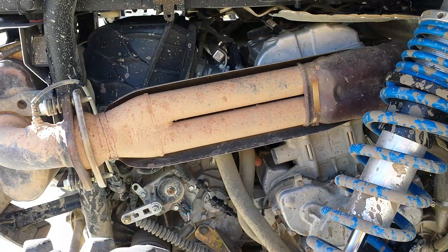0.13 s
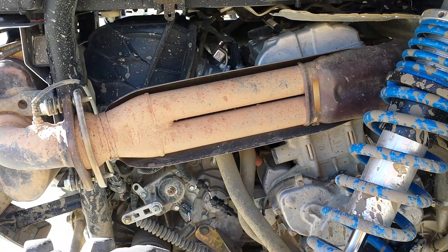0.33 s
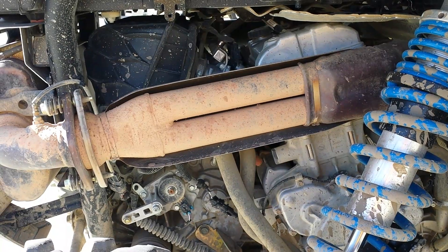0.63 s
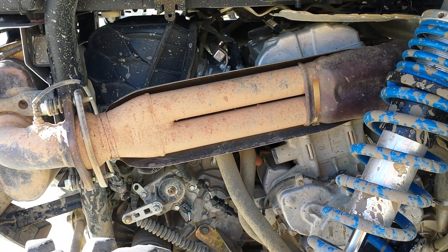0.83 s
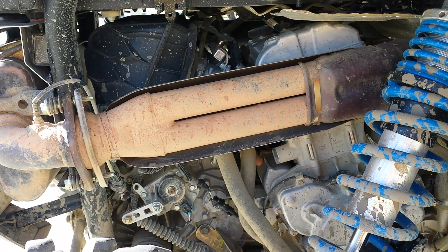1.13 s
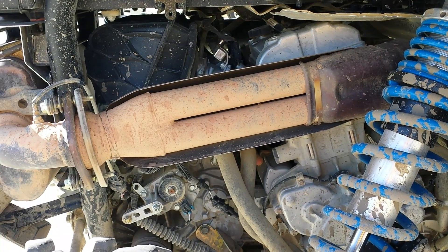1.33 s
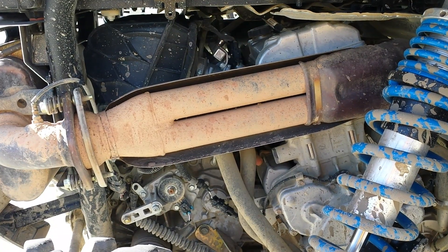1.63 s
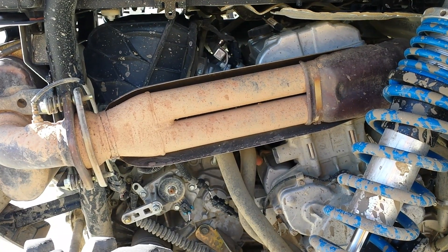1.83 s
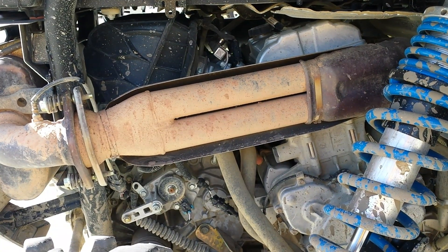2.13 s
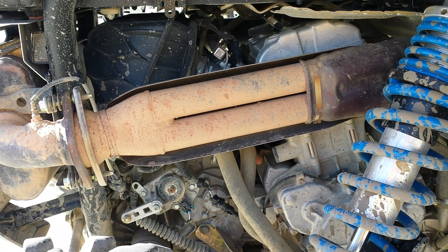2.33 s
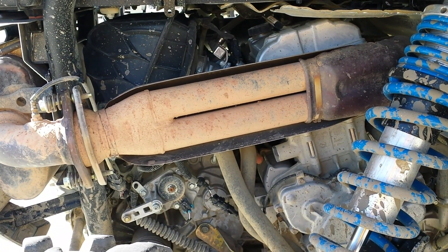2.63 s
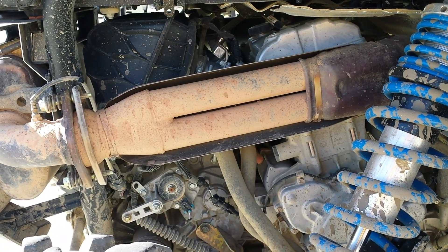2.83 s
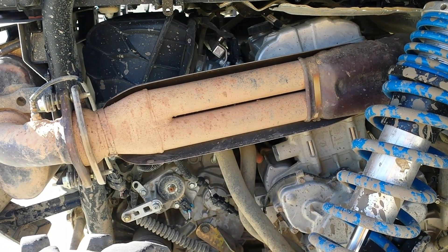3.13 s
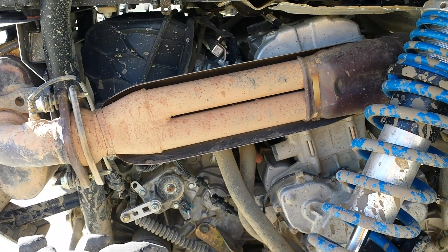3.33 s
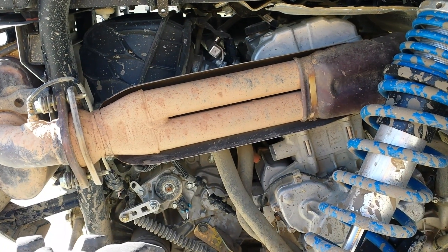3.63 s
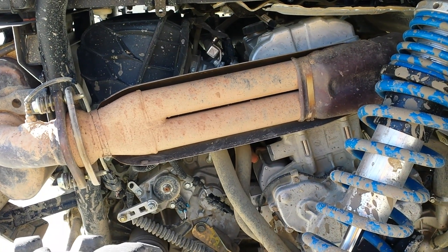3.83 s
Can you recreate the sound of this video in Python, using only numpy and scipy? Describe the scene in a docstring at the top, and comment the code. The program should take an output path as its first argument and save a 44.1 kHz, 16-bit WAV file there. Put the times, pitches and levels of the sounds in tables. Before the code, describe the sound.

An off-road vehicle engine idles with a deep boom and fast, regular metallic knocking.

```python
"""Beside an idling off-road vehicle, a stereo pair of microphones close to the engine.
After a moment of silence the sound fades in. In each working cycle, about eleven a second, two gas
pulses ring the ducts with a deep boom; then a cluster of metal contacts knocks on the block and its
covers. The valve gear ticks to the right, and a steady mechanical hiss lies behind it all."""
import sys
import numpy as np
from scipy.fft import rfft, irfft, next_fast_len
from scipy.io import wavfile
from scipy.ndimage import uniform_filter1d, minimum_filter1d

SR = 44100
rng = np.random.default_rng(int(sys.argv[2]) if len(sys.argv) > 2 else 0)


def dump(signal):
    """Clip the signal to [-1, 1] and save it as 16-bit WAV at the path in sys.argv[1]."""
    limited = np.clip(np.atleast_2d(signal).T, -1, 1)
    pcm = np.round(limited * 32767).astype(np.int16)
    wavfile.write(sys.argv[1], SR, pcm)


N = 176400

# Levels within a table are relative; balance is left minus right.
# start of each working cycle (time [s])
CYCLE_STARTS = [.321, .4123, .5049, .5975, .6869, .7741, .8639, .9569, 1.0458, 1.1343, 1.2202, 1.3061,
                1.3969, 1.4838, 1.5686, 1.6534, 1.7441, 1.8331, 1.923, 2.0101, 2.0972, 2.1842, 2.2726,
                2.3596, 2.4495, 2.5393, 2.6289, 2.7201, 2.8097, 2.8993, 2.99, 3.0788, 3.165, 3.2516, 3.3386,
                3.4284, 3.517, 3.6033, 3.6891, 3.7771, 3.8644, 3.9555, 4.045]
# gas pulses (time into the cycle [s], level [dB])
GAS_PULSES = [(-.0015, -6), (0.019, -7)]
# duct resonances (frequency [Hz], level [dB], t60 [s])
DUCT_MODES = [(52, -70, 0.064), (97.4, 2.5, 0.17), (177.6, -8.5, 0.098), (277.4, -15, 0.083)]
# metal contacts (time into the knock [s], cover [dB], block [dB], clatter [dB], tick [dB])
METAL_CONTACTS = [(.0004, -7, 1.5, -3.5, -1), (.0072, -8, 0, -3.5, 0.5), (0.0138, -3, -25, 0, -7),
                  (.021, -7.5, -7, -6, -8.5), (0.031, -6.5, -25, -14.5, -8), (0.0366, -4, -9, -9, -6),
                  (.047, -12.5, -11, -16, -13), (.061, -7, -16.5, -7, -6.5)]
# block resonances (frequency [Hz], level [dB], t60 [s], balance [dB])
BLOCK_MODES = [(1068, -1, 0.093, 1), (1210, -15.5, 0.091, -2), (1277, -5.5, 0.11, -14), (1338, -7, 0.12, 3),
               (1415, 2.5, 0.12, -1.5), (1467, -5.5, 0.26, 5), (1494, -5, 0.067, -1),
               (1584, -2.5, 0.11, 13), (1779.4, 2.5, 0.072, 7), (1812, -9, 0.14, -25),
               (2002, -2, 0.16, -41), (2122, -4.5, 0.1, -27), (2146, -4, 0.11, -5), (2200, -6, 0.11, 2),
               (2390, -15.5, 0.19, -1), (2457, -4, 0.11, 0), (2580, -5.5, 0.14, 1), (2675, -8.5, 0.1, 4),
               (2780, -3.5, 0.1, -1), (2838, -3.5, 0.077, -4), (2960, -14, 0.071, -2)]
# dense ringing of the small parts (frequency [Hz], level [dB])
CLATTER_SPECTRUM = [(500, -19), (950, -12), (1400, 3.5), (2100, -1.5), (2850, -4.5), (3300, -17),
                    (4500, -16), (9000, -55)]
# cover resonances (frequency [Hz], width [Hz], level [dB], balance [dB])
COVER_MODES = [(284, 55, -6, -31.5), (368, 15, -5.5, 14), (463, 73, -10.5, -4.5), (769, 35, 1, -5),
               (836, 11.4, 5.5, 0), (850, 10.7, 1, 15.5)]
# treble of the contacts (frequency [Hz], level [dB])
TICK_SPECTRUM = [(1500, -30), (3000, -3), (4100, -5), (4900, 3.5), (5450, 4), (6000, 1), (6800, 2),
                 (7600, 2), (8600, -7.5), (9700, -15.5), (11000, -13.5), (12200, -0.5), (13200, -18),
                 (14400, -11)]
# valve gear resonances (frequency [Hz], width [Hz], level [dB], balance [dB])
VALVE_MODES = [(5140, 38, -4, -15), (5453, 22, 6.5, -5), (5830, 31, 3, -13), (6460, 59, 2.5, -13),
               (6840, 90, -4.5, -31), (8470, 140, -6, -4), (12250, 85, -23, -39)]
# steady running noise (frequency [Hz], level [dB])
HISS_SPECTRUM = [(25, -26), (60, 11), (150, 10.5), (300, 0.5), (600, -2.5), (850, 1), (1500, 5.5),
                 (2700, 0), (4000, -8.5), (6200, -4.5), (8500, -9), (9800, -20), (12500, -16.5),
                 (14300, -16.5)]
# where the noise sits between the microphones (frequency [Hz], balance [dB])
MIC_BALANCE = [(1000, 5), (2000, -4), (4000, -3.5), (6500, -5), (8500, -11.5), (10300, -8), (12000, -37),
               (14000, -43)]
# how alike the two microphones hear it (frequency [Hz], correlation [0..1])
MIC_CORRELATION = [(100, 0.86), (500, 1), (1500, 0.37), (3000, 0.23), (6000, 0.05)]

CONTACT_S, COVER_HIT_DB, BLOCK_HIT_DB, CLATTER_HIT_DB, TICK_HIT_DB = np.transpose(METAL_CONTACTS)
KNOCK_STARTS = CYCLE_STARTS[:-1] + .465 * np.diff(CYCLE_STARTS)  # just before mid-cycle
KNOCK_SAMPLES = 8192
MIC_SIDES = np.array([[.5], [-.5]])  # left and right share of a phase difference


def duct_boom(rise_s=.0024, pulse_width_s=.0006, low_cut_hz=37.2):
    """Two gas pulses a cycle ring the ducts; the width of a pulse softens its treble."""
    t, flow = np.arange(2 * KNOCK_SAMPLES) / SR, np.zeros(N)
    note = -sum(amp(db - 60 * t / t60) * np.sin(2 * np.pi * hz * t) for hz, db, t60 in DUCT_MODES)
    note *= 1 - np.exp(-t / rise_s)
    for start in CYCLE_STARTS[:-1]:
        for delay, db in GAS_PULSES:
            add(flow, start + delay, amp(db + rng.normal(0, .02)) * note)
    low_cut = lambda hz: hz ** 4 / (hz ** 4 + low_cut_hz ** 4)
    return filtered(flow, lambda hz: np.exp(-(np.pi * hz * pulse_width_s) ** 2) * low_cut(hz))


def block_knock(scatter_db=2, scatter_rad=.13, skew_rad=.61):
    """Each contact feeds the block's modes, which build up and ring on into the next cycle."""
    t = np.arange(KNOCK_SAMPLES) / SR
    age = np.maximum(t - CONTACT_S[:, None], 0)
    rings, track = [], np.zeros((2, N))
    for hz, db, t60, balance in BLOCK_MODES:
        rise_s = .0009 * (hz / 1000) ** 2.1  # higher modes build up more slowly
        swells = (1 - np.exp(-age / rise_s)) * amp(BLOCK_HIT_DB[:, None] + db - 60 * age / t60)
        phase = rng.uniform(0, 2 * np.pi) + skew_rad * rng.choice([-1, 1]) * MIC_SIDES
        rings.append(pan(balance) * power_sum(swells) * np.exp(1j * (2 * np.pi * hz * t + phase)))
    for start in KNOCK_STARTS:
        size, shift = rng.standard_normal((2, len(BLOCK_MODES)))
        weights = amp(scatter_db * size) * np.exp(1j * scatter_rad * shift)
        add(track, start, np.tensordot(weights, rings, 1).real)
    return unit(track)


def parts_clatter():
    """The contacts shake the small parts, whose dense ringing blurs into noise."""
    force = contact_force(CLATTER_HIT_DB, attack_s=.0013, t60=.036, fresh=.25, scatter_db=1.2)
    return spread(force, CLATTER_SPECTRUM)


def cover_knock(dull_hz=1410):
    """The contacts ring the covers, which radiate little treble."""
    force = contact_force(COVER_HIT_DB, attack_s=.0015, t60=.062, fresh=.33, scatter_db=.9)[0]
    ringing = ring(force, COVER_MODES, skew_rad=.12)
    return filtered(ringing, lambda hz: 1 / (1 + (hz / dull_hz) ** 4))


def contact_ticks():
    """Metal meeting metal gives short bursts of treble, mostly in the right microphone."""
    force = contact_force(TICK_HIT_DB, attack_s=.0024, t60=.046, fresh=.36, scatter_db=1.7)
    return spread(force, TICK_SPECTRUM)


def valve_ticks():
    """Sharp contacts of uneven strength ring the high modes of the valve gear."""
    force = contact_force(TICK_HIT_DB, attack_s=.0007, t60=.037, fresh=.35, scatter_db=5.8)[0]
    return ring(force, VALVE_MODES, skew_rad=1.1)


def running_hiss():
    """Chain, gears and belt run steadily in the background."""
    return spread(rng.standard_normal((2, N)), HISS_SPECTRUM)


def contact_force(levels_db, attack_s, t60, fresh, scatter_db):
    """Two tracks of broadband rattle that repeats each knock, with a fresh share of its power."""
    age = np.maximum(np.arange(KNOCK_SAMPLES) / SR - CONTACT_S[:, None], 0)
    bursts = amp(levels_db)[:, None] * (1 - np.exp(-age / attack_s)) * amp(-60 * age / t60)
    grain = rng.standard_normal((2, KNOCK_SAMPLES))
    for _ in range(3):  # even out the repeating noise in spectrum, then in level
        white = irfft(np.exp(1j * np.angle(rfft(grain * power_sum(bursts)))))
        grain = white / np.sqrt(abs(uniform_filter1d(white ** 2, size=64)) + 1e-12)
    force = np.zeros((2, N))
    for start in KNOCK_STARTS:
        sizes = amp(scatter_db * rng.standard_normal((len(bursts), 1)))
        rattle = np.sqrt(1 - fresh) * grain + np.sqrt(fresh) * rng.standard_normal(grain.shape)
        add(force, start, rattle * power_sum(sizes * bursts))
    return force


def ring(force, modes, skew_rad):
    """Ring a body; each mode reaches the two microphones up to skew_rad apart."""
    skews = skew_rad * rng.choice([-1, 1], len(modes)) * rng.uniform(.37, 1, len(modes))
    resonance = lambda f, hz, width: 1j * f * width / (hz * hz - f * f + 1j * f * width)
    return unit(filtered(force, lambda f: sum(
        amp(db) * pan(balance) * np.exp(1j * skew * MIC_SIDES) * resonance(f, hz, width)
        for (hz, width, db, balance), skew in zip(modes, skews))))


def spread(pair, spectrum):
    """Colour two unrelated signals and place them; the treble comes from the right."""
    angle = lambda hz: np.arccos(along(MIC_CORRELATION, hz)) / 2
    shares = lambda hz: [np.cos(angle(hz)), np.sin(angle(hz))]
    mid, side = filtered(pair, lambda hz: amp(along(spectrum, hz)) * shares(hz))
    mics = np.array([mid + side, mid - side])
    return unit(filtered(mics, lambda hz: pan(along(MIC_BALANCE, hz))))


def amp(db):
    """Decibels to gain."""
    return 10 ** (np.asarray(db) / 20)


def unit(x):
    """Scale to rms 1."""
    return x / np.sqrt(np.mean(x ** 2) + 1e-20)


def power_sum(envelopes):
    """Joint envelope of unrelated sounds."""
    return np.sqrt((envelopes ** 2).sum(0))


def along(points, hz):
    """Interpolate (frequency, value) points on a log axis."""
    freqs, values = np.transpose(points)
    return np.interp(np.log(hz + 1), np.log(freqs + 1), values)


def filtered(x, response):
    """Filter x by a complex response of frequency."""
    size = next_fast_len(N + SR // 2)
    return irfft(rfft(x, size) * response(np.fft.rfftfreq(size, 1 / SR)), size)[..., :N]


def add(track, start_s, sound):
    """Mix a sound into a track."""
    i = round(start_s * SR)
    part = track[..., i:i + sound.shape[-1]]
    part += sound[..., :part.shape[-1]]


def pan(balance_db):
    """Left and right gains of constant power."""
    ratio = amp(np.atleast_1d(balance_db))
    return np.array([ratio, np.ones_like(ratio)]) / np.sqrt(1 + ratio ** 2)


def scene():
    """The engine at the microphones: the boom in the centre, metal and hiss around it."""
    return (duct_boom() + amp(-29) * cover_knock() + amp(-24.5) * parts_clatter()
            + amp(-32) * contact_ticks() + amp(-35.5) * valve_ticks()
            + amp(-21) * block_knock() + amp(-23) * running_hiss())


def record(dry, fade_s=(.38, .65), ceiling=.95, reaction_s=.003, top_hz=14700, edge_hz=300):
    """The recorder fades in, limits the highest peaks and keeps nothing above its band limit."""
    sound = dry * np.interp(np.arange(N) / SR, fade_s, [0, 1])
    width = int(reaction_s * SR)
    needed_gain = 1 / np.maximum(abs(sound).max(0) / ceiling, 1)
    gain = uniform_filter1d(minimum_filter1d(needed_gain, 2 * width + 1), width)
    return filtered(sound * gain, lambda hz: np.clip((top_hz - hz) / edge_hz + .5, 0, 1))


dry = scene()
out = record(dry)
dump(out)
```